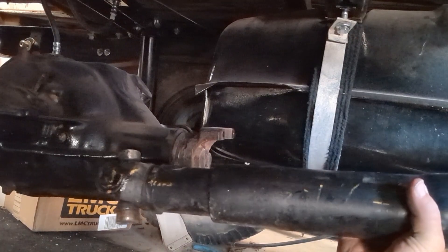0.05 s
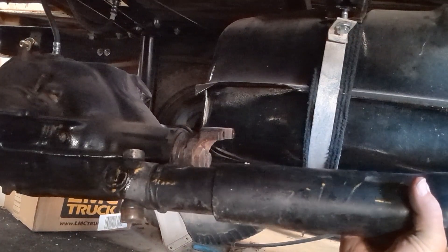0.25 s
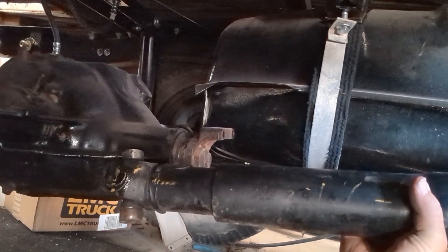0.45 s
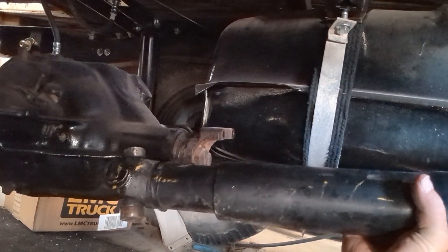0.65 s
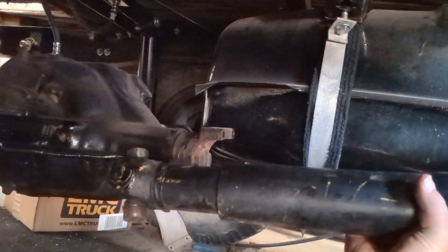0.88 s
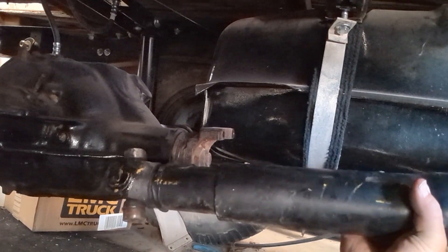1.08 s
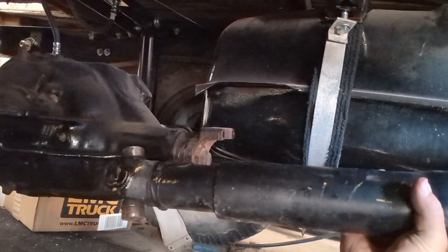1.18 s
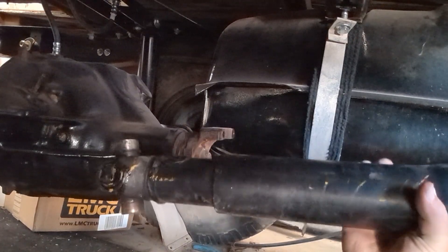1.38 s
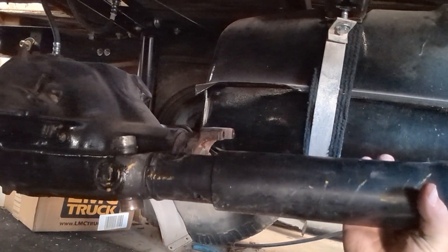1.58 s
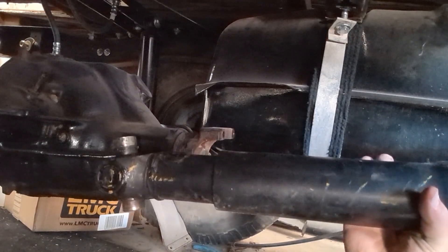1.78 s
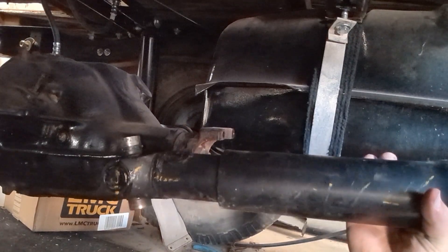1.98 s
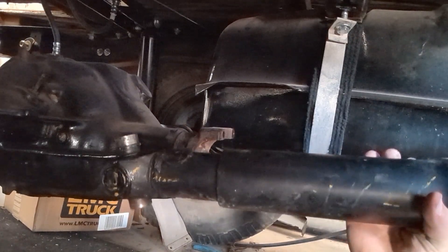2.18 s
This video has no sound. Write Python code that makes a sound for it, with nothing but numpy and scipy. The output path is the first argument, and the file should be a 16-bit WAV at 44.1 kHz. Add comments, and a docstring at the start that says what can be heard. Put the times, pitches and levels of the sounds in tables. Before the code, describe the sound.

Heavy hollow steel tube clanks and knocks against a loose metal joint in a quiet garage

```python
"""Under a truck in a garage a hand works a heavy steel driveshaft against the differential yoke.
At the start a bright clank, as decaying narrowband modes, dies away over a low hum and garage noise.
Then knocks excite the tube's damped modes into a dull pipe ring, with joint rattle and noise tails.
A hand slides on the paint, the shaft thuds on another part with a noise crack, soft rubbing begins;
later come scraping grains, an uneven bending hum of the gripped tube, and single-mode rings."""
import sys
import numpy as np
from scipy import signal
from scipy.io import wavfile
from scipy.ndimage import uniform_filter1d

SR = 44100
rng = np.random.default_rng(int(sys.argv[2]) if len(sys.argv) > 2 else 0)


def attenuation_scalar(level_db):
    """Turn a level in dB into a linear amplitude multiplier (20 dB per decade)."""
    decades = np.asarray(level_db, float) / 20
    return 10 ** decades


def log_audio(samples):
    """Write samples as a 16-bit WAV file to the path given in sys.argv[1]."""
    # one column per channel
    frames = np.atleast_2d(samples).T
    # limit to full scale, then quantise
    limited = np.clip(frames, -1, 1)
    pcm = np.round(limited * 32767).astype(np.int16)
    wavfile.write(sys.argv[1], SR, pcm)


N = 99225
TIME_S = np.arange(N) / SR
EDGES_HZ = 24 * 2 ** np.arange(0, 9.4, 1 / 3)  # third-octave bands
CENTRES_HZ = np.sqrt(EDGES_HZ[1:] * EDGES_HZ[:-1])
TILT_HZ = 800  # pivot of the spectral tilts


def rms_one(x):
    """Normalization: scale to rms 1."""
    return x / np.sqrt(np.mean(x ** 2) + 1e-20)


def at_hz(points, hz):
    """Interpolation of a spectrum on a logarithmic frequency axis."""
    points_hz, values = np.transpose(points)
    return np.interp(np.log(hz), np.log(points_hz), values)


def unit_gains(spectrum):
    """Power summation: band gains that give the spectrum an rms near 1."""
    gain = attenuation_scalar(at_hz(spectrum, CENTRES_HZ))
    return gain / np.sqrt(np.sum(gain ** 2 * np.diff(EDGES_HZ)) * 2 / SR)


def train(times_s, gain):
    """Impulsive excitation: clicks at the given times."""
    out = np.full(N, 1e-18)
    places = np.clip(np.asarray(times_s) * SR, 0, N - 1).astype(int)
    np.add.at(out, places, gain)
    return out


def ring(clicks, hz, t60):
    """Damped resonance: a unit click sets a sine of height 1 ringing."""
    r, w = attenuation_scalar(-60 / (t60 * SR)), 2 * np.pi * hz / SR
    return signal.lfilter([0, np.sin(w)], [1, -2 * r * np.cos(w), r * r], clicks)


def fall(clicks, t60):
    """Exponential decay: each click starts an envelope that falls to a thousandth in t60."""
    return signal.lfilter([1], [1, -attenuation_scalar(-60 / (t60 * SR))], clicks)


def narrow(hz, width_hz):
    """Resonant filtering: noise twice through a narrow resonance, at rms 1."""
    r, x = np.exp(-np.pi * width_hz / SR), rng.standard_normal(N + SR // 4)
    for _ in range(2):
        x = signal.lfilter([1, 0, -1], [1, -2 * r * np.cos(2 * np.pi * hz / SR), r * r], x)
    return rms_one(x[SR // 4:])


def soft(x):
    """Contact stiffness: a soft contact low-passes the blow, more steeply two octaves up."""
    contact_hz = 1610
    x = signal.lfilter(*signal.butter(2, contact_hz, fs=SR), x)
    return signal.lfilter(*signal.butter(2, 4 * contact_hz, fs=SR), x)


# modes of a clank just before the start: (frequency [Hz], level at 0 s [dB], t60 [s])
CLANK_MODES = [(2250, -66.5, 1.5), (4300, -74, 1.2), (8560, -66.5, 0.2)]
CLANK_WAVER = 0.006  # bandwidth as a share of the frequency


def clank():
    """Free decay: bright modes, already ringing, beat unevenly as narrow noise bands."""
    out = np.zeros((2, N))
    for hz, db, t60 in CLANK_MODES:
        stereo = np.array([narrow(hz, CLANK_WAVER * hz) for _ in range(2)])
        out += attenuation_scalar(db - 60 / t60 * TIME_S) * stereo
    return out


# spectrum of the noise behind the clank: (frequency [Hz], relative level per Hz [dB])
CLANK_TAIL_SPECTRUM = [(59, -26.5), (100, 3.5), (576, -16.5), (791, -2.5), (2320, -6), (8770, -36.5)]
CLANK_TAIL_DB, CLANK_TAIL_T60_S = -51, 0.49  # at 0 s; t60 at TILT_HZ


def clank_tail_power(k):
    """Frequency-dependent damping: the clank's noise dies sooner at higher frequency."""
    faster = (CENTRES_HZ[k] / TILT_HZ) ** 0.27
    level = attenuation_scalar(CLANK_TAIL_DB - 60 * TIME_S / CLANK_TAIL_T60_S * faster)
    return (unit_gains(CLANK_TAIL_SPECTRUM)[k] * level) ** 2


HUM_HZ, HUM_WIDTH_HZ = 60.6, 8.7
HUM_BAND_DB, HUM_TONE_DB = -64.5, -60.5  # rms of the band, peak of the tone


def hum():
    """Superposition: a steady low tone inside a wavering narrow band."""
    tone = np.sin(2 * np.pi * HUM_HZ * TIME_S)
    return attenuation_scalar(HUM_BAND_DB) * narrow(HUM_HZ, HUM_WIDTH_HZ) + attenuation_scalar(HUM_TONE_DB) * tone


# steady noise of the garage: (frequency [Hz], relative level per Hz [dB])
GARAGE_SPECTRUM = [(25, -27), (70, 0), (204, -38), (314, -26.5), (703, -28), (1080, -35.5), (15500, -69.5)]
GARAGE_DB = -66


def garage_power(k):
    """Stationary noise: the garage floor keeps one power in each band."""
    return (unit_gains(GARAGE_SPECTRUM)[k] * attenuation_scalar(GARAGE_DB)) ** 2


# modes of the steel tube:
# (frequency [Hz], level [dB], t60 [s], left minus right level [dB], left lag [ms])
SHAFT_MODES = [(146.4, -19, 0.6, -3, 0.056), (328.5, -18, 0.5, 0.5, 0.54), (514.3, -20.5, 0.33, -5.2, 0.11),
               (560, -17, .27, -7, 0.033), (630, -26, 0.25, 1, 0.16), (674, -20.5, 0.051, 5.5, 0.1),
               (800.3, 0, .09, -4.5, 0.18), (780, -42.5, 1.7, -1.6, .1), (1136, -14.5, 0.12, -1.7, 0.042),
               (1356, -9.5, 0.087, 1, 0.19), (1915, -14.5, 0.047, -8.5, .1)]


def shaft(clicks_by_mode):
    """Modal superposition: damped modes add, each sounding from its own place in the stereo field."""
    out = np.zeros((2, N))
    for clicks, (hz, mode_db, t60, pan_db, lag_ms) in zip(clicks_by_mode, SHAFT_MODES):
        sound = attenuation_scalar(mode_db) * ring(clicks, hz, t60)
        lagged = np.interp(TIME_S - lag_ms / 1000, TIME_S, sound)
        out += [attenuation_scalar(pan_db / 2) * lagged, attenuation_scalar(-pan_db / 2) * sound]
    return soft(out)


# knocks of the shaft: (time [s], level [dB], treble tilt above TILT_HZ [dB per octave],
# bass tilt below it [dB per octave], tail level [dB])
KNOCKS_TABLE = [(.213, -40.5, -2, -7, 24), (.241, -6.5, -2.6, -1.38, 1), (.735, -54, 10.5, 4.5, 15.5),
                (.773, -40, 7.5, -20.5, 3.5), (.804, -38.5, 8, 2.5, 7.5), (1.049, -16, -5.5, 1, 4.5),
                (1.162, -47, 6, -9, -2), (1.404, -71, 14.5, -0.5, 12.5), (1.911, -49.5, -0.5, -11, 19),
                (1.948, -40.5, 9, 0.5, 4), (1.959, -70, 3, -3, 1)]
FIRST_TOUCH_S, FIRST_TOUCH_DB = 0.0022, -10  # a lighter touch leads each knock
MODE_CHANCE_DB = 1.5  # random spread of each mode in each knock


def knock_db(hz):
    """Spectral tilt: the level in dB of every knock at one frequency."""
    _, db, treble_db, bass_db, _ = np.transpose(KNOCKS_TABLE)
    octaves = np.log2(hz / TILT_HZ)
    return db + treble_db * np.clip(octaves, 0, 2) - bass_db * min(octaves, 0)


def knocks():
    """Impact excitation: each knock is a light and a full touch that strike every tube mode."""
    s = np.transpose(KNOCKS_TABLE)[0]
    clicks = []
    for k, (hz, *_) in enumerate(SHAFT_MODES):
        chance_db = MODE_CHANCE_DB * rng.standard_normal(len(s))
        gain = attenuation_scalar(knock_db(hz) + chance_db) * (-1) ** (k + 1)
        first = train(s - FIRST_TOUCH_S / 2, gain * attenuation_scalar(FIRST_TOUCH_DB))
        clicks.append(first + train(s + FIRST_TOUCH_S / 2, gain))
    return shaft(clicks)


# bright modes of the joint, shaken by its rattle: frequency [Hz]
YOKE_MODES_HZ = [1610, 2150, 2420, 2690, 2815, 3340, 3980, 4870, 5245]
YOKE_DB, YOKE_TILT_DB, YOKE_T60_S = -55.5, -11.5, 0.1  # tilt per octave
JOINT_HZ = np.geomspace(2300, 15300, 40)
JOINT_DB, JOINT_TILT_DB, JOINT_T60_S = -33.5, -9, 0.012  # tilt per octave
CHATTER_S, CHATTER_PER_S = 0.05, 6100  # length of a rattle, clicks in all short modes together
CHATTER_GROWS = 1.24  # rattle dB per dB of the knock


def joint():
    """Repeated impact: the loose cross rattles after each knock into ringing and short high modes."""
    s, db, *_ = np.transpose(KNOCKS_TABLE)
    out = np.zeros((2, N))
    shape = np.linspace(1, 0, int(CHATTER_S * SR)) ** 1.2
    level = signal.fftconvolve(train(s - FIRST_TOUCH_S / 2, attenuation_scalar(CHATTER_GROWS * db)), shape)[:N]
    for hz in YOKE_MODES_HZ:
        gain = attenuation_scalar(YOKE_DB + YOKE_TILT_DB * np.log2(hz / YOKE_MODES_HZ[0]))
        out += gain * ring(level * rng.standard_normal((2, N)) + 1e-18, hz, YOKE_T60_S)
    chance = CHATTER_PER_S / len(JOINT_HZ) / SR
    for hz in JOINT_HZ * rng.uniform(0.97, 1.03, len(JOINT_HZ)):
        clicks = (rng.random((2, N)) < chance) * rng.standard_normal((2, N))
        gain = attenuation_scalar(JOINT_DB + JOINT_TILT_DB * np.log2(hz / JOINT_HZ[0]))
        out += gain * ring(level * clicks + 1e-18, hz, JOINT_T60_S)
    return signal.sosfilt(signal.butter(2, 1400, "high", fs=SR, output="sos"), out)


# chassis and room after a blow: (frequency [Hz], relative level per Hz [dB])
TAIL_SPECTRUM = [(35, -28.5), (60, -7.5), (327, -1.5), (673, -5), (810, -4.5), (999, -12), (1150, -9),
                 (15500, -80.5)]
# its decay: (frequency [Hz], t60 [s])
TAIL_DECAY = [(60, .5), (1000, 0.34), (3000, 0.38), (8000, .18), (16000, .12)]
TAIL_DB, TAIL_RISE_S = -23, 0.0045
THUD_TAIL_DB, THUD_TAIL_TILT_DB = -9.5, -1.5  # tilt per octave away from TILT_HZ
LATE_DB, LATE_STRETCH = -25, 4.8  # slow garage decay: level under the tail, multiple of its t60


def tail_power(k):
    """Reverberant decay: knocks and thud feed a tail and a fainter, slower answer of the garage."""
    hz = CENTRES_HZ[k]
    s, *_, tail_db = np.transpose(KNOCKS_TABLE)
    thud_s, thud_db = THUD_TOUCHES[0]
    thud_db = thud_db + THUD_TAIL_DB + THUD_TAIL_TILT_DB * abs(np.log2(hz / TILT_HZ))
    starts = train(s, attenuation_scalar(2 * (knock_db(hz) + tail_db + TAIL_DB)))
    starts += train([thud_s], attenuation_scalar(2 * thud_db))
    power_t60 = at_hz(TAIL_DECAY, hz) / 2  # power falls 60 dB in twice this time
    rise = np.exp(-1 / (TAIL_RISE_S * SR))
    early = signal.lfilter([1 - rise], [1, -rise], fall(starts, power_t60))
    late = attenuation_scalar(2 * LATE_DB) * fall(starts, LATE_STRETCH * power_t60)
    return unit_gains(TAIL_SPECTRUM)[k] ** 2 * (early + late)


# strokes of the hand on the tube: (middle [s], length [s], level [dB])
SLIDE_STROKES = [(0.446, 0.18, -65.5), (0.57, 0.074, -66)]
# their noise: (frequency [Hz], relative level per Hz [dB])
SLIDE_SPECTRUM = [(300, -28), (1000, 6.5), (3000, -1), (6000, -14.5), (10000, -17)]


def slide_power(k):
    """Friction noise: the hand's rubbing swells and fades as a squared cosine."""
    level = np.zeros(N)
    for middle, length, db in SLIDE_STROKES:
        level += attenuation_scalar(db) * np.cos(np.pi * np.clip((TIME_S - middle) / length, -0.5, 0.5)) ** 2
    return (unit_gains(SLIDE_SPECTRUM)[k] * level) ** 2


# touches of the duller thud: (time [s], level [dB])
THUD_TOUCHES = [(0.492, -29.5), (0.5001, -35), (.512, -45)]
# modes of the part it meets: (frequency [Hz], level [dB], t60 [s])
THUD_MODES = [(67, -7, 0.43), (152.7, -9, 0.29), (290.4, -9.5, 0.43), (558, 6.5, 0.022), (756, 1, 0.023),
              (930, 2.5, 0.056), (960, -17.5, 0.45), (1082.3, -24, 1.1), (1270, -23.5, 1.1),
              (2550, -19, 0.34)]


def thud():
    """Damped impact: a few soft touches excite the modes of another part."""
    s, db = np.transpose(THUD_TOUCHES)
    out = np.zeros((2, N))
    for k, (hz, mode_db, t60) in enumerate(THUD_MODES):
        gain = (-1) ** k * attenuation_scalar(db + mode_db + rng.normal(0, 1.6, len(s)))
        sound = ring(train(s, gain), hz, t60)
        out += [sound, np.roll(sound, rng.integers(0, 12))]  # right lags by a few samples
    return soft(out)


# short cracks of broadband noise at the thud and two knocks: (time [s], level [dB], t60 [s])
CRACK_TIMES = [(0.495, -41.5, 0.11), (0.8055, -36.5, 0.073), (1.947, -40.5, 0.033)]
# their noise: (frequency [Hz], relative level per Hz [dB])
CRACK_SPECTRUM = [(300, 12), (800, 15.5), (2700, -0.5), (6000, -38.5), (15500, -46.5)]


def crack_power(k):
    """Broadband transient: each crack is a noise burst with exponential decay."""
    bursts = sum(fall(train([s], attenuation_scalar(2 * db)), t60 / 2) for s, db, t60 in CRACK_TIMES)
    return unit_gains(CRACK_SPECTRUM)[k] ** 2 * bursts


# soft rubbing noise: a rustle, and a short slide stroke near 0.9 s: (time [s], level [dB])
RUBBING_LEVEL = [(.55, -64), (.87, -75.5), (.905, -53), (.96, -80.5), (1.14, -62.5), (1.26, -67.5),
                 (1.33, -76.5), (1.88, -96.5), (2.0, -73), (2.2, -102)]
RUBBING_HZ, RUBBING_DB_PER_OCTAVE2 = 2400, -15  # centre, fall per squared octave


def rubbing_power(k):
    """Band-limited noise: the soft rubbing's power falls off as a bell around its centre."""
    db = np.interp(TIME_S, *np.transpose(RUBBING_LEVEL), left=-120)
    return attenuation_scalar(2 * (db + RUBBING_DB_PER_OCTAVE2 * np.log2(CENTRES_HZ[k] / RUBBING_HZ) ** 2))


# metal dragging on metal: (time [s], level [dB])
SCRAPE_LEVEL = [(.62, -73), (.72, -58.5), (.9, -60), (1.04, -72), (1.3, -79), (1.84, -79.5), (1.92, -58),
                (2.25, -87)]
SCRAPE_FROM_S, SCRAPE_PER_S, SCRAPE_SPREAD_DB = 0.62, 1100, 4.5
SCRAPE_TREBLE_TILT_DB, SCRAPE_BASS_TILT_DB = 2, 3  # rise per octave above and below TILT_HZ


def scrape():
    """Friction excitation: dense random grains strike the same tube modes as the knocks."""
    struck = rng.random(N) < SCRAPE_PER_S / SR
    size_db = SCRAPE_SPREAD_DB * np.minimum(rng.exponential(1, N), 4)
    grit = struck * attenuation_scalar(size_db) * rng.choice([-1, 1], N)
    main_hz, _, main_t60, *_ = SHAFT_MODES[6]
    grit = grit / np.sqrt(np.mean(ring(grit, main_hz, main_t60) ** 2))  # main mode rings at rms 1
    grit = grit * attenuation_scalar(np.interp(TIME_S, *np.transpose(SCRAPE_LEVEL))) * (TIME_S > SCRAPE_FROM_S)
    clicks = []
    for hz, *_ in SHAFT_MODES:
        tilt_db = SCRAPE_TREBLE_TILT_DB if hz > TILT_HZ else SCRAPE_BASS_TILT_DB
        clicks.append(grit * attenuation_scalar(tilt_db * np.log2(hz / TILT_HZ)))
    return shaft(clicks)


# the grip shakes the lowest bending mode; one list per spell: (time [s], level [dB])
HANDLING_SPELLS = [
    [(.62, -69), (.74, -61.5), (.87, -43), (1.03, -67.5)],
    [(1.8, -75), (2.06, -60.5), (2.12, -51), (2.25, -69)],
]
BEND_HZ, BEND_WIDTH_HZ = 146.5, 15


def handling():
    """Forced vibration: the grip keeps the lowest bending mode humming unevenly."""
    level = np.zeros(N)
    for spell in HANDLING_SPELLS:
        level += attenuation_scalar(np.interp(TIME_S, *np.transpose(spell), left=-120, right=-120))
    return uniform_filter1d(level, size=900) * narrow(BEND_HZ, BEND_WIDTH_HZ)


# single-mode rings, from small parts and from small knocks:
# (time [s], frequency [Hz], level [dB], t60 [s])
PING_MODES = [(0.731, 4050, -68, 0.09), (0.803, 2680, -45, 0.04), (0.804, 2040, -43, 0.04),
              (0.893, 5210, -65, 0.08), (0.894, 2120, -56, 0.05), (0.897, 3440, -61, 0.06),
              (1.235, 520, -49, 0.16), (1.715, 1340, -64, 0.08), (1.95, 2770, -57, 0.12),
              (1.975, 2394, -66, 0.5), (2.076, 640, -53, 0.05), (2.077, 404, -48, 0.23),
              (2.085, 270, -62, 0.4)]
PING_RISE_S = 0.0012
PING_ROUGH = 9  # bandwidth in Hz times t60 in s


def pings():
    """Single-mode decay: rings swell in milliseconds; above 1 kHz they blur into narrow noise."""
    out = np.zeros((2, N))
    for s, hz, db, t60 in PING_MODES:
        age = np.maximum(TIME_S - s, 0)
        shape = attenuation_scalar(db - 60 * age / t60) * (1 - np.exp(-age / PING_RISE_S)) ** 2
        if hz > 1000:
            tone = np.array([narrow(hz, PING_ROUGH / t60) for _ in range(2)])
        else:
            tone = np.sin(2 * np.pi * (hz * age + rng.uniform(0, 0.12, (2, 1))))
        out += shape * tone
    return out


# stereo likeness of the noise: (frequency [Hz], left-right correlation [-])
LIKENESS_SPECTRUM = [(30, 0.66), (100, 0.89), (400, 0.65), (1000, 0.1), (15000, 0.053)]


def noise_bands():
    """Partial coherence: third-octave noise, flat per Hz, mixes a shared and an opposed part."""
    white, bands = rng.standard_normal((2, 2, N)), []
    for k, (low, high) in enumerate(zip(EDGES_HZ, EDGES_HZ[1:])):
        band_pass = signal.butter(2, [low, high], "band", fs=SR, output="sos")
        mid, side = signal.sosfilt(band_pass, white[k % 2])
        alike = np.clip(at_hz(LIKENESS_SPECTRUM, CENTRES_HZ[k]), -1, 1)
        bands.append(np.sqrt(1 + alike) * mid + np.sqrt(1 - alike) * side * [[1], [-1]])
    return bands


def diffuse():
    """Energy addition: the noisy layers add their powers in one shared bank of bands."""
    out = np.zeros((2, N))
    for k, band in enumerate(noise_bands()):
        power = clank_tail_power(k) + garage_power(k) + tail_power(k)
        power += slide_power(k) + crack_power(k) + rubbing_power(k)
        out += band * np.sqrt(power)
    return out


def scene():
    """Linear superposition of everything under the truck."""
    ringing = clank() + hum() + knocks() + joint() + thud() + scrape() + handling() + pings()
    return ringing + diffuse()


def band_limit(x):
    """A steep low-pass at the top of the band."""
    return signal.sosfilt(signal.butter(12, 15680, fs=SR, output="sos"), x)


def record(dry):
    """High-pass response: the microphone drops the deepest bass, below 48.5 Hz."""
    mix = signal.sosfilt(signal.butter(3, 48.5, "high", fs=SR, output="sos"), dry)
    return band_limit(mix)


dry = scene()
out = record(dry)
log_audio(out)
```